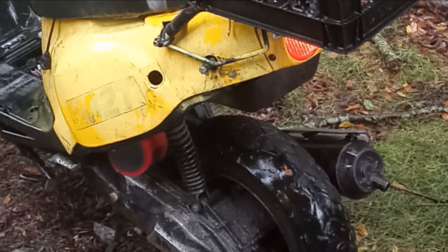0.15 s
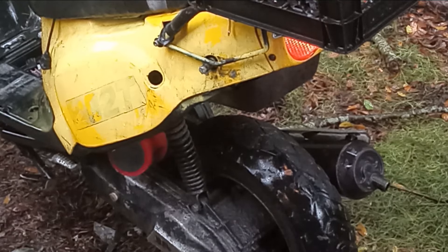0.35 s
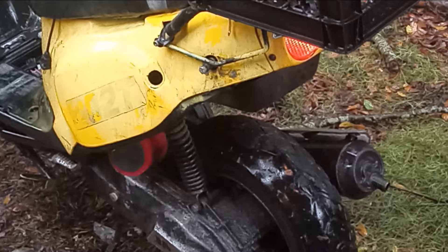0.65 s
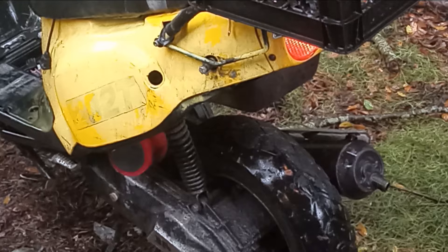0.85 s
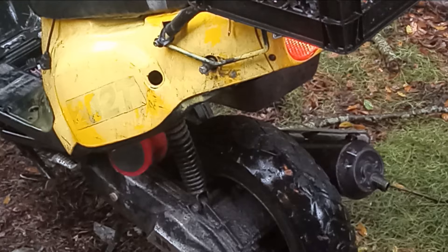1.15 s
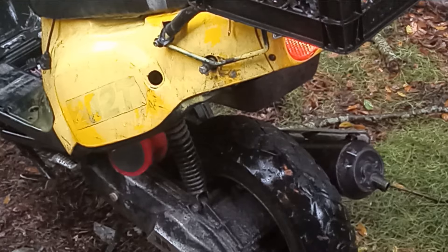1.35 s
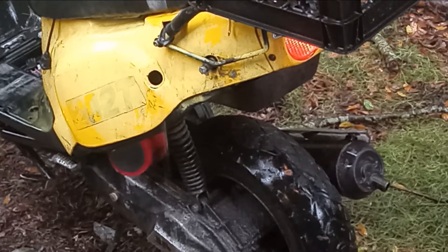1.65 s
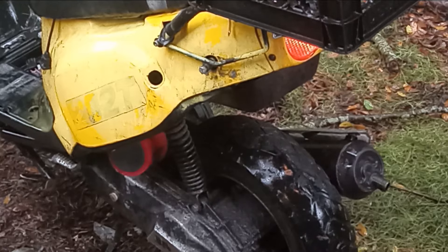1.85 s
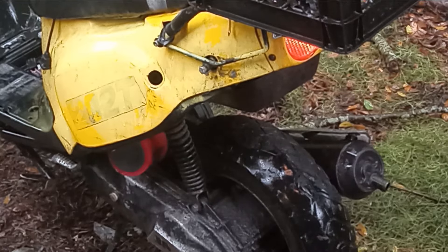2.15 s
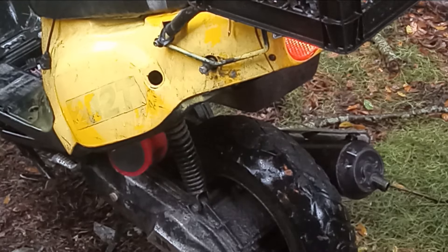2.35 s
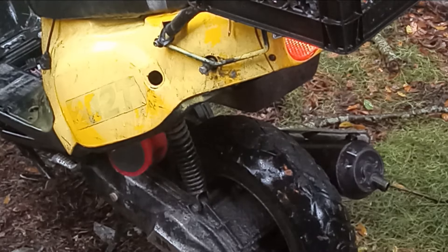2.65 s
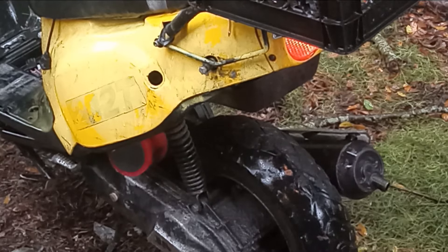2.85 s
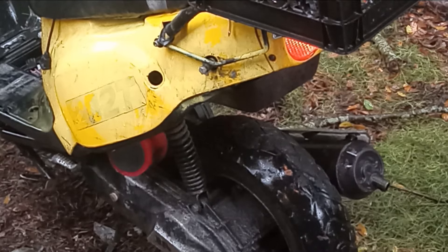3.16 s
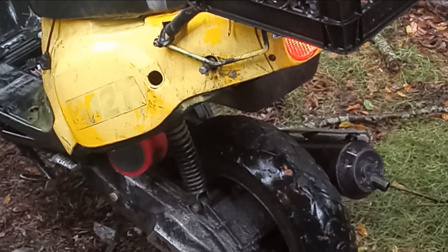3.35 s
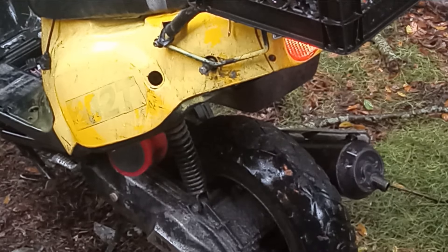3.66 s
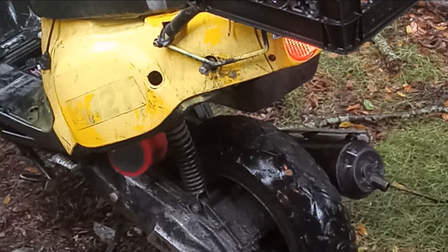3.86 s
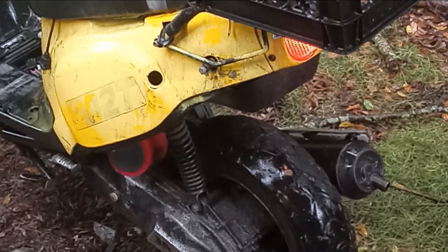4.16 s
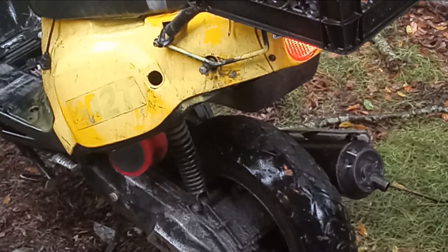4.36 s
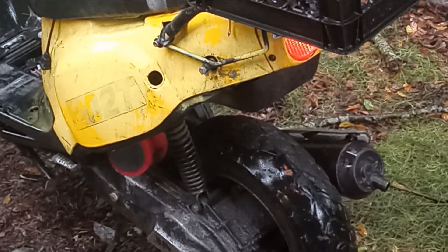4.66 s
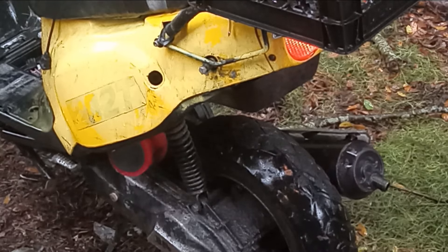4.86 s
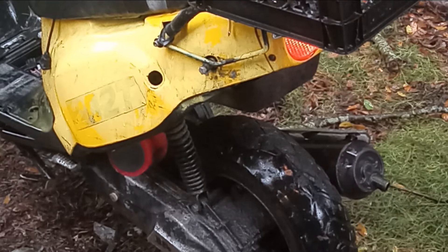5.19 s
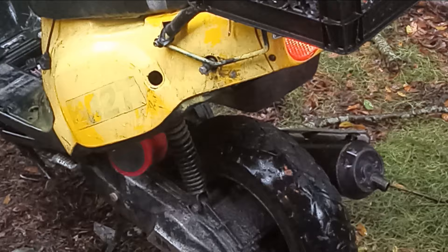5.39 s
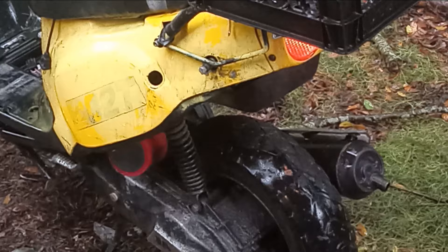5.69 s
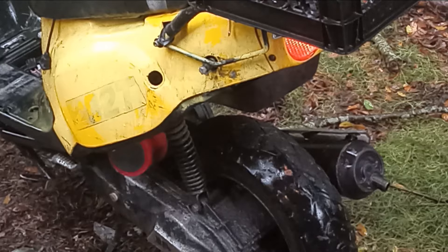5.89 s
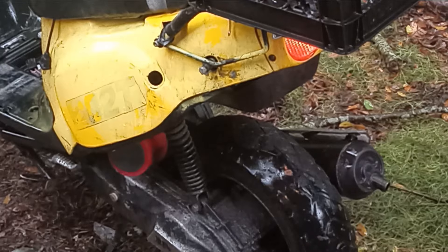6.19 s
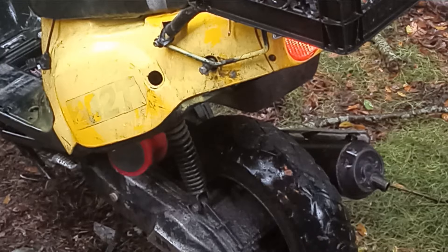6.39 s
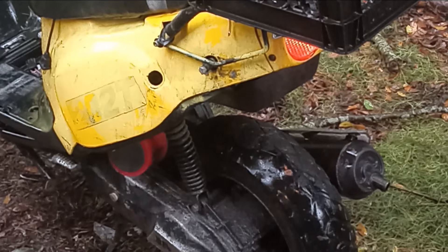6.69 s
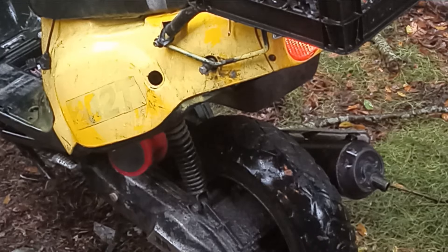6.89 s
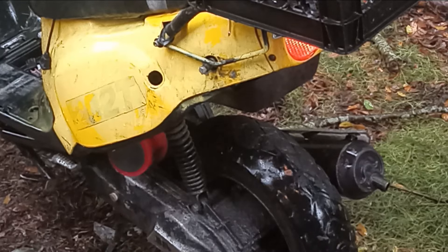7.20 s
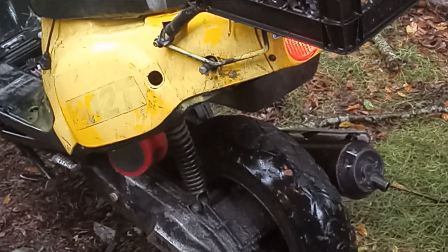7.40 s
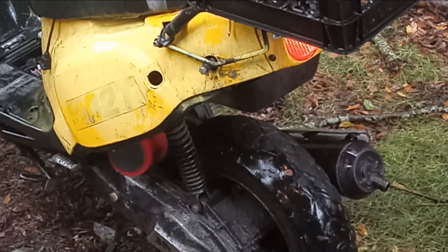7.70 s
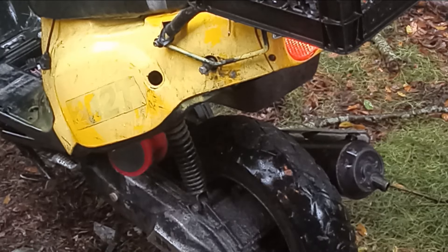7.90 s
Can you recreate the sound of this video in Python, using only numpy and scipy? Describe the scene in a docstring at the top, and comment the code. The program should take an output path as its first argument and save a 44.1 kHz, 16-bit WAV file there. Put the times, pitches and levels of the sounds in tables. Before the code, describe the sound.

Rapid, uneven metallic chugging from a scooter starter, dry and near the microphone outdoors. Gear rattle and knocks repeat about nine times a second, with brief mid-pitched free-spinning buzzes and a few dull thumps. The button is released, the motor whirrs down, and near silence follows. A clunk and harsh grind begin a second, longer cranking attempt; the engine never catches.

```python
"""Scooter starter cranking twice

An electric starter cranks an engine outdoors, pauses, cranks again; the engine never catches.
Each compression knocks, rings and rattles the gears: contact noise through case, steel and cover modes.
When the drive slips the gears spin free: a harmonic whirr at mesh rate; it coasts down on release.
Gulps, a squeak, low clunks, ticks and dull thumps are shaped noise, over faint hiss and distant hum."""
import sys
import numpy as np
from scipy.fft import rfft, irfft, next_fast_len
from scipy.io import wavfile
from scipy.ndimage import uniform_filter1d, minimum_filter1d, map_coordinates

SR = 44100
rng = np.random.default_rng(int(sys.argv[2]) if len(sys.argv) > 2 else 0)


def log_audio(samples):
    """Write samples as a 16-bit WAV file to the path given in sys.argv[1]."""
    # one column per channel
    frames = np.atleast_2d(samples).T
    # limit to full scale, then quantise
    limited = np.clip(frames, -1, 1)
    pcm = np.round(limited * 32767).astype(np.int16)
    wavfile.write(sys.argv[1], SR, pcm)


N = 354563


def amp(db):
    """Decibels to gain."""
    return 10 ** (np.asarray(db) / 20)


def unit(x):
    """Scale to rms 1."""
    return x / np.sqrt(np.mean(x ** 2) + 1e-20)


def colour(points):
    """Response through (frequency [Hz], level [dB]) points on a log axis."""
    hz_points, db = np.transpose(points)
    return lambda hz: amp(np.interp(np.log(hz + 1), np.log(hz_points), db))


def body(modes, spread_db=0, count=1):
    """Causal responses of a set of resonances, struck count times with different mode strengths."""
    hz, width, db = np.transpose(modes)
    signs = (-1) ** np.arange(len(hz))
    gains = signs * amp(db + spread_db * rng.standard_normal((count, len(hz))))

    def skirt(f):  # the skirts die away towards the treble
        return 1 / (1 + 1j * f / (0.6 * hz.max())) ** 2

    def ring(f):
        damping = 1j * f * width[:, None]
        return damping / (hz[:, None] ** 2 - f * f + damping)

    return lambda f: np.squeeze((gains / np.abs(skirt(hz))) @ ring(f)) * skirt(f)


def filtered(x, response):
    """x times a response of frequency, along its last axis."""
    n = x.shape[-1]
    m = next_fast_len(n + SR // 8)
    spectrum = rfft(x, m) * response(np.fft.rfftfreq(m, 1 / SR))
    return irfft(spectrum, m)[..., :n]


def noise(response):
    """Coloured noise of rms 1."""
    return unit(filtered(rng.standard_normal(N), response))


def wobble(rate_hz, size=N):
    """A smooth random curve, rate_hz knots a second."""
    knots = rng.standard_normal(int(size * rate_hz / SR) + 4)
    return map_coordinates(knots, [np.arange(size) * rate_hz / SR])


def gate(start, end, rise, fall):
    """1 from start to end [s], easing in before and out after."""
    t = np.arange(N) / SR
    return np.clip(1 + np.minimum((t - start) / rise, (end - t) / fall), 0, 1) ** 2


def curve(rows, axis=1):
    """One column of a table, one value per sample."""
    rows = np.asarray(rows)
    return np.interp(np.arange(N) / SR, rows[:, 0], rows[:, axis])


def placed(times, sounds, db, length):
    """Lay one sound at each time, with the energy of level db held for length seconds."""
    out = np.zeros(N + SR)
    for s, sound, gain in zip(times, sounds, amp(db)):
        scale = np.sqrt(length * SR / np.sum(sound ** 2))
        out[round(s * SR):][:len(sound)] += gain * sound * scale
    return out[:N]


def bursts(events, response):
    """Short swells of noise through one response, each reaching its level at its middle."""
    t = np.arange(N) / SR
    source = noise(response)
    out = np.zeros(N)
    for s, db, length in events:
        near = np.abs(t - s) < 2 * length
        swell = np.exp(-2 * ((t[near] - s) / length) ** 2)
        puff = source[near] * swell
        out[near] += amp(db) * puff * np.linalg.norm(swell) / np.linalg.norm(puff)
    return out


def contacts(shape, rate_hz, grit):
    """Tooth contacts at random moments over a share of smooth scraping."""
    clicks = (rng.random(shape) < rate_hz / SR) * rng.standard_normal(shape)
    return unit(clicks) + grit * rng.standard_normal(shape)


# Transmission cover modes: (frequency [Hz], width [Hz], level [dB])
COVER_MODES = [(1600, 44, -6), (1854, 56, 6), (2344, 33, -1), (2744, 25, 0.5), (2982, 31, 3),
               (3173, 21, -1.5), (3507, 46, -4), (3646, 49, -1.5), (3725, 21, 3), (3887, 44, 2),
               (4500, 84, 7.5), (4675, 150, 2), (5140, 67, -9), (5180, 223, 0.5), (5300, 19, -13),
               (5750, 18, 11), (5950, 64, 5.5), (6150, 66, 2.5), (6430, 170, -5), (6490, 31, 2),
               (6940, 97, 3), (6760, 33, 3.5), (7400, 45, -7)]
# Cover's dense bed of weaker modes: (frequency [Hz], level [dB])
CLATTER_SPECTRUM = [(300, -33), (600, -4.5), (1100, -18), (1450, 0), (2100, -1), (2500, -1.5), (4200, -4.5),
                    (6000, 0.5), (7000, -4.5), (8500, -15), (10000, -24), (13600, -29), (15500, -27)]


def casing(x, broad_db, spread_db=0):
    """The transmission cover: sharp modes over a dense bed of weaker ones."""
    modes = body(COVER_MODES, spread_db, count=len(np.atleast_2d(x)))
    sharp = unit(filtered(x, modes))
    dense = unit(filtered(x, colour(CLATTER_SPECTRUM)))
    return sharp + amp(broad_db) * dense


# One table per attempt, steady pace between rows:
# (time [s], case knock [dB], steel ring [dB], rattle [dB])
CRANKING_ATTEMPTS = [
    [(.071, -31, -36, -35), (.592, -31.5, -33, -36.5), (.906, -26, -44, -33), (1.036, -30.5, -32.5, -34.5),
     (1.458, -32.5, -33.5, -37), (1.969, -34, -30.5, -40.5), (2.302, -32.5, -35.5, -34.5),
     (3.148, -28.5, -35, -35.5), (3.263, -44, -29.5, -46)],
    [(4.351, -29.5, -37, -30), (4.448, -33, -41, -33), (4.68, -33, -36, -31.5), (5.096, -29.5, -34.5, -34),
     (5.741, -28, -41, -33), (6.276, -29.5, -31.5, -35.5), (6.605, -31, -39, -33),
     (6.828, -31.5, -31.5, -35), (7.033, -32, -32, -38.5), (7.374, -33, -33, -32),
     (7.903, -28.5, -34, -38.5), (8.018, -30, -33, -39)],
]
STROKE_S = .107  # usual time between compressions


def compressions():
    """Every compression of both attempts, evenly paced between rows: times, then knock, ring, rattle dB."""
    rows = []
    for attempt in CRANKING_ATTEMPTS:
        for here, there in zip(attempt, attempt[1:]):
            count = max(1, round((there[0] - here[0]) / STROKE_S))
            rows.extend(np.linspace(here, there, count, endpoint=False))
        rows.append(attempt[-1])
    return np.transpose(rows)


RELEASE_S, RESTART_S = 3.333, 4.35  # button let go, pressed again
SETTLE_S = 2.5


def freshness(t):
    """1 at the restart, dying away as the starter settles; 0 through the first attempt."""
    second_attempt = t > RELEASE_S + (RESTART_S - RELEASE_S) / 2
    return second_attempt * np.exp(-np.abs(t - RESTART_S) / SETTLE_S)


# Gear case modes: (frequency [Hz], width [Hz], level [dB])
CASE_MODES = [(1344, 17, -8), (1478, 75, -11.5), (1665.6, 35, 1), (1780, 31.4, -4), (1884, 31, -3),
              (2019, 48, -8), (2730, 10.7, -10.5), (3030, 30, -19.5)]
# Steel gear modes: (frequency [Hz], width [Hz], level [dB])
STEEL_MODES = [(3620, 17, -12.5), (5050, 65, -16.5), (5130, 47, -2), (5287, 24, 1.5), (10860, 110, -35),
               (12400, 250, -53)]
# Bright tick of the teeth: (frequency [Hz], level [dB])
TICK_SPECTRUM = [(500, -16), (1600, -2), (8500, -1.5), (9600, -12), (12500, -9.5), (13700, -28),
                 (14500, -13)]
TICK_DB, FRESH_TICK_DB = -10, 2.5  # tick re rattle; extra on restarting
SLIP_SOFTENS_DB = 1  # compressions knock less while the drive slips


def strokes():
    """The gears take up the load with bouncing knocks, then chatter as the piston goes over the top."""
    s, *levels = compressions()
    count = len(s)
    slipping = sum((s > start) & (s < end) for start, end, *_ in DRIVE_SLIPS)
    scatter_db = [[1.0], [1.5], [0.6]] * rng.standard_normal((len(levels), count))
    knock_db, ring_db, rattle_db = levels - SLIP_SOFTENS_DB * slipping + scatter_db
    tick_db = rattle_db + TICK_DB + FRESH_TICK_DB * freshness(s)
    t = np.arange(SR // 6) / SR
    shape = (count, len(t))

    def swell(peak_s, order):
        return (t / peak_s * np.exp(1 - t / peak_s)) ** order

    def scrape(peak_s):
        return unit(contacts(shape, 2500, 0.69) * swell(peak_s, order=2))

    blows = np.zeros(shape)
    for delay_s, db in [(.0005, -0.5), (.0098, 0.5), (.018, -3.5)]:  # bounces
        at_s = np.abs(delay_s * (1 + .1 * rng.standard_normal(count)))
        index = np.round(at_s * SR).astype(int)
        blows[np.arange(count), index] += amp(db + 3.6 * rng.standard_normal(count))
    blows = unit(blows)

    case = body(CASE_MODES, spread_db=3.5, count=count)
    knock = filtered(0.64 * blows + scrape(0.013), case)
    steel = body(STEEL_MODES, spread_db=4.5, count=count)
    ring = filtered(blows + 0.58 * scrape(0.011), steel)
    tick = filtered(contacts(shape, 2500, 0.48) * swell(0.009, order=1), colour(TICK_SPECTRUM))
    chatter_swell = swell(0.025, order=4) + 1.7 * swell(0.02, order=2)
    chatter = contacts(shape, 2200, 1.0) * chatter_swell
    rattle = casing(chatter, broad_db=-8, spread_db=4.5)
    return (placed(s, knock, knock_db, 0.035) + placed(s, ring, ring_db, 0.026)
            + placed(s, tick, tick_db, 0.015) + placed(s, rattle, rattle_db, 0.064))


# Gear growl: (frequency [Hz], level [dB])
GROWL_SPECTRUM = [(130, -16), (240, -6), (340, -2.5), (450, -9), (610, 0.5), (760, 0), (885, 7),
                  (1080, -16), (1400, 3.5), (2500, -37.5)]
RUSTLE_DB, GROWL_DB = -42, -55  # base levels
FRESH_RUSTLE_DB, FRESH_GROWL_DB = 8.5, 12  # extra on restarting
LULL_S, LULL_DB = 0.052, 2  # quieter as the piston climbs to each compression


def gears():
    """The turning gear train rustles and growls: loudest at the restart, dipping before each compression."""
    t, s = np.arange(N) / SR, compressions()[0]
    turning = (gate(0, RELEASE_S, rise=.022, fall=0.53)
               + gate(RESTART_S, t[-1], rise=0.017, fall=.02))
    fresh = freshness(t)
    following = s[np.minimum(np.searchsorted(s, t), len(s) - 1)]
    ahead_s = np.abs(following - t)
    lull = amp(-LULL_DB * np.exp(-(ahead_s / LULL_S) ** 2))
    cover_rustle = unit(casing(contacts(N, 1500, 0.66), broad_db=0.5))
    rustle = cover_rustle + amp(-3.5) * noise(body(CASE_MODES))
    growl = unit(filtered(contacts(N, 500, 0.78), colour(GROWL_SPECTRUM)))
    rustle_gain = amp(RUSTLE_DB + FRESH_RUSTLE_DB * fresh + 2.3 * wobble(70))
    growl_gain = amp(GROWL_DB + FRESH_GROWL_DB * fresh + 3.7 * wobble(35))
    return turning * lull * (rustle * rustle_gain + growl * growl_gain)


# Resonances lifting harmonics 1, 3, 5 as they pass: (frequency [Hz], width [Hz], level [dB])
WHIRR_RESONANCES = [(371.4, 5.5, -30.5), (434.7, 18, -34), (1326, 64, -31.5), (1927, 55, -28),
                    (2048, 143, -28.5), (2310, 64, -32)]


def lifted(hz):
    """Gain of a strong harmonic at hz, from the resonances around it."""
    centre, width, db = np.transpose(WHIRR_RESONANCES)[..., None]
    power = amp(db) ** 2 / (1 + (2 * (hz - centre) / width) ** 2)
    return np.sqrt(np.sum(power, axis=0))


# Weaker harmonics re the strong ones: (frequency [Hz], level [dB])
OVERTONE_SPECTRUM = [(740, -16), (800, -8), (845, -5.5), (890, -15.5), (1550, -22.5), (1780, -8.5),
                     (2400, -8), (2750, -11.5), (3600, -17), (4050, -13.5), (4500, -15.5), (5300, -10.5),
                     (7500, -39)]
GRIP_LAG_S, GRIP_S, GRIP_DB = 0.0291, 0.02107, 8.5  # a compression chokes the whirr: delay, length, depth
GRIP_SLOWS = .025  # share of speed lost under a compression
RASP_GRIP_DB, FRESH_RASP_DB = 6.5, 5  # extra rasp under a compression, on restarting


def whirr(on, speed_hz, flutter_db):
    """The unloaded gears buzz at their mesh rate; the higher a harmonic, the rougher it is."""
    live = on > 0
    size = live.sum()
    live_s = np.flatnonzero(live) / SR
    # each compression briefly loads the teeth, slows them and breaks up the tone
    since_s = live_s - compressions()[0][:, None]
    grip = np.exp(-((since_s - GRIP_LAG_S) / GRIP_S) ** 2).max(axis=0)
    pace_hz = speed_hz[live] * (1 - GRIP_SLOWS * grip + .004 * wobble(35, size=size))
    mesh_hz = pace_hz * (1 + .005 * wobble(300, size=size))
    phase = 2 * np.pi * np.cumsum(mesh_hz) / SR

    strong = {k: lifted(k * pace_hz) for k in (1, 3, 5)}
    force = np.sqrt(sum(g ** 2 for g in strong.values()))
    bite = np.clip((mesh_hz - 372) / 45, .05, 1) ** 2  # slow teeth meet softly: the treble goes first
    cover_rasp = unit(casing(contacts(size, 2500, 0.98), broad_db=0.5))
    growl = unit(filtered(rng.standard_normal(size), colour(GROWL_SPECTRUM)))
    rasp = cover_rasp + amp(-7.5) * growl
    rasp_gain = amp(-16 + RASP_GRIP_DB * grip + FRESH_RASP_DB * freshness(live_s))
    buzz = rasp_gain * force * bite * rasp * (1 + 0.61 * np.cos(phase))

    choke = amp(-GRIP_DB * grip)
    for k in range(1, 14):
        drift, jitter = wobble(70, size=size), wobble(260, size=size)
        if k in strong:
            gain = strong[k] * amp(2.5 + flutter_db * drift)
            rough = 0.078 * k
        else:  # the other harmonics follow the strong ones, coloured by the case
            gain = force * colour(OVERTONE_SPECTRUM)(mesh_hz * k)
            gain = gain * amp(-3.5 + 1.49 * flutter_db * drift)
            gain = gain * bite ** np.clip((k - 6) / 2, 0, 1)
            rough = .16 * k
        roughness = rough * jitter * (0.54 + 1.65 * grip)
        tone = np.sin(k * phase + roughness + 2 * np.pi * rng.random())
        buzz += np.sqrt(2) * gain * choke * tone
    out = np.zeros(N)
    out[live] = on[live] * buzz
    return out


# Drive slips, mesh rates before grip and wobble: (start [s], end [s], mesh rate [Hz],
# mesh rate after next compression [Hz], relative level [dB], catching grind level [dB])
DRIVE_SLIPS = [(-.05, 0.002, 444.5, 444, -8, -38.5), (0.639, 0.822, 445.5, 437.6, 0, -43),
               (2.015, 2.206, 450.5, 431.5, 1.5, -38.5), (2.592, 2.636, 442, 435, 0, -43),
               (3.215, 3.305, 449.5, 429.5, 1.5, -42.5), (5.176, 5.315, 450, 444, -1.5, -35),
               (5.726, 5.888, 443.6, 449.7, 1, -38.5), (6.327, 6.495, 447, 437.5, 3.5, -37.5),
               (7.087, 7.386, 448, 415, -1.2, -38), (7.944, 8.044, 446, 430, 0, -48)]
GRIND_LAG_S, GRIND_S = 0.018, 0.044  # delay after a slip, half-length
AFTER_RING_DB, AFTER_RING_S = -13.5, 0.23  # the whirr lingers after a slip


def slips():
    """The drive lets go and the gears spin free; a compression shifts their speed; they grind on catching."""
    t, s = np.arange(N) / SR, compressions()[0]
    grinds = [(end + GRIND_LAG_S, grind_db, GRIND_S) for _, end, *_, grind_db in DRIVE_SLIPS]
    out = bursts(grinds, colour(GROWL_SPECTRUM))
    for start, end, free_hz, loaded_hz, db, _ in DRIVE_SLIPS:
        load_s = s[np.argmax(s > start)]
        speed_hz = np.interp(t, [load_s, load_s + 2 * GRIP_LAG_S], [free_hz, loaded_hz])
        free = gate(start, end, rise=.035, fall=0.047)
        after = amp(AFTER_RING_DB) * gate(start, end, rise=0.038, fall=AFTER_RING_S)
        out += amp(db) * whirr(np.maximum(free, after), speed_hz, flutter_db=3.0)
    return out


# Motor run-down, before grip and wobble: (time [s], mesh rate [Hz])
COAST_SPEED = [(3.32, 414), (3.352, 407), (3.36, 403.6), (3.396, 408), (3.466, 396.8), (3.502, 395.4),
               (3.59, 368.7)]
COAST_DB = -1.5  # re the other whirrs


def coast():
    """With the button let go the motor runs down freely."""
    on = gate(COAST_SPEED[0][0], COAST_SPEED[-1][0], rise=.035, fall=0.028)
    return amp(COAST_DB) * whirr(on, curve(COAST_SPEED), flutter_db=2.35)


ENGAGE_LAG_S, ENGAGE_S = .072, .048  # delay after the restart, half-length
ENGAGE_GRIND_DB, ENGAGE_KNOCK_DB, ENGAGE_CLATTER_DB = -34.5, -29, -32


def engage():
    """On the restart the teeth grind into mesh, batter the gear case and set the cover clattering."""
    s = RESTART_S + ENGAGE_LAG_S
    parts = [(ENGAGE_GRIND_DB, colour(GROWL_SPECTRUM)), (ENGAGE_KNOCK_DB, body(CASE_MODES)),
             (ENGAGE_CLATTER_DB, colour(CLATTER_SPECTRUM))]
    return sum(bursts([(s, db, ENGAGE_S)], response) for db, response in parts)


# Gear's squeaking mode: (frequency [Hz], width [Hz], level [dB])
SQUEAK_MODE = [(2020, 18, 4)]
# Gear squeaks: (time [s], level [dB], half-length [s])
SQUEAK_EVENTS = [(.915, -22, 0.0089)]
# Low resonances, near 300-700 Hz: (frequency [Hz], width [Hz], level [dB])
LOW_MODES = [(309, 17, 4), (460, 190, -2), (700, 27, -6)]
# A soft gulp, then clunks as the starter engages: (time [s], level [dB], half-length [s])
LOW_KNOCK_EVENTS = [(1.825, -42.5, 0.023), (4.37, -27.5, 0.015), (4.425, -34.5, 0.067)]
# Bright ticks, in the pause and as the starter contact closes: (time [s], level [dB], half-length [s])
TICK_EVENTS = [(3.82, -50, .005), (4.347, -38, .004)]


def snags():
    """A gear squeak, a soft low gulp and clunks, and bright ticks: noise bursts through their spectra."""
    return (bursts(SQUEAK_EVENTS, body(SQUEAK_MODE)) + bursts(LOW_KNOCK_EVENTS, body(LOW_MODES))
            + bursts(TICK_EVENTS, colour(TICK_SPECTRUM)))


def intake():
    """After each compression the piston draws a soft gulp through the air box."""
    s = compressions()[0]
    t = np.arange(SR // 6) / SR
    draw = rng.standard_normal((len(s), len(t))) * np.exp(-((t - .078) / 0.033) ** 2)
    air_box = body([(352.3, 93, 0)])  # (frequency [Hz], width [Hz], level [dB])
    gulps = filtered(draw, lambda f: air_box(f) ** 2)
    scatter_db = 3.5 * rng.standard_normal(len(s))
    return placed(s, gulps, -52.5 + scatter_db, 0.03)


# Dull thumps: (time [s], level [dB], half-length [s])
THUMP_EVENTS = [(.32, -43.5, .05), (.59, -31.5, 0.065), (.9, -34, 0.076), (1.03, -26, 0.039),
                (1.12, -37, 0.057), (1.24, -37.5, .04), (1.425, -33.5, 0.046), (3.945, -42.5, 0.02),
                (6.59, -44, 0.038), (7.462, -28, 0.016), (7.5, -36.5, 0.046)]
# Thump spectrum: (frequency [Hz], level [dB])
THUD_SPECTRUM = [(20, -44), (50, -9.5), (100, 0.5), (160, -3.5), (250, -13), (400, -29), (1000, -75)]


def thumps():
    """Dull low thumps: short swells of low noise."""
    return bursts(THUMP_EVENTS, colour(THUD_SPECTRUM))


# Outdoor hiss: (frequency [Hz], level [dB])
AIR_SPECTRUM = [(130, 3.5), (600, 1), (1100, -9), (1900, 3), (3400, -10), (6000, -5), (8700, -8),
                (11000, -26.5), (13600, -30), (15500, -21)]
# Distant hum: (frequency [Hz], level [dB])
HUM_SPECTRUM = [(25, -43), (48, -32), (70, 0), (115, -17.5), (200, -21.5), (600, -70)]
# Hum loudness: (time [s], level [dB])
HUM_LEVELS = [(3.3, -68), (3.7, -50), (4.1, -47.5), (4.5, -55), (5.6, -46.5), (6.3, -57.5)]


def outdoors():
    """Faint steady hiss and a distant low hum of changing level, both coloured noise."""
    hiss = amp(-52.5) * noise(colour(AIR_SPECTRUM))
    hum = amp(curve(HUM_LEVELS)) * noise(colour(HUM_SPECTRUM))
    return hiss + hum


def scene():
    """The scooter close by, in the open air."""
    starter = strokes() + gears() + slips() + coast() + engage() + snags()
    return (starter + intake() + thumps() + outdoors())[None]


TOP_HZ = 15800


def record(dry):
    """A fast limiter holds the peaks down; nothing passes above the band limit."""
    needed = np.minimum(1, amp(-14.5) / (np.abs(dry) + 1e-9))
    gain = uniform_filter1d(minimum_filter1d(needed, size=300), size=300)
    return filtered(dry * gain, lambda hz: hz < TOP_HZ)


dry = scene()
out = record(dry)
log_audio(out)
```